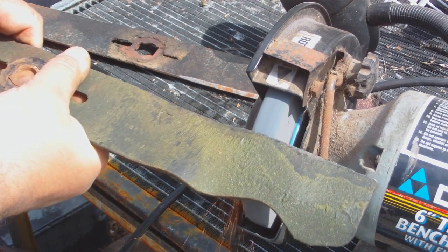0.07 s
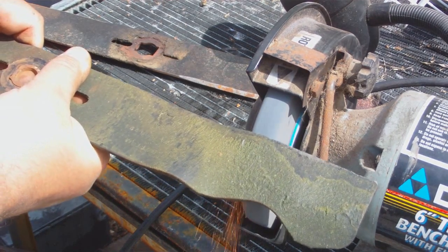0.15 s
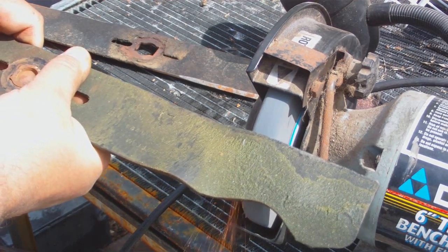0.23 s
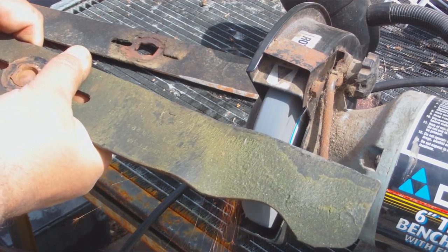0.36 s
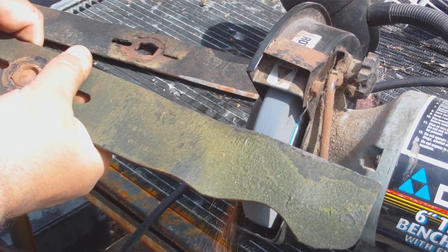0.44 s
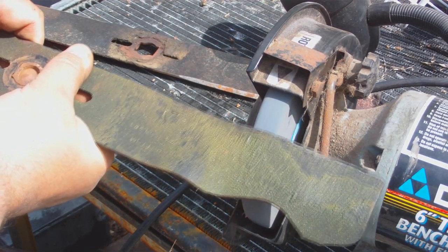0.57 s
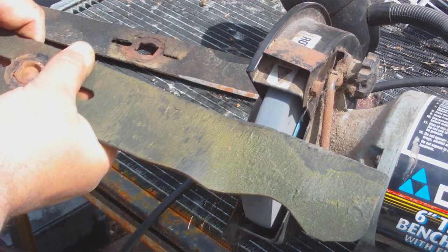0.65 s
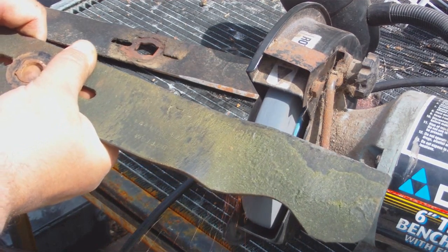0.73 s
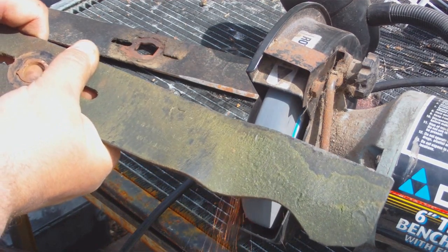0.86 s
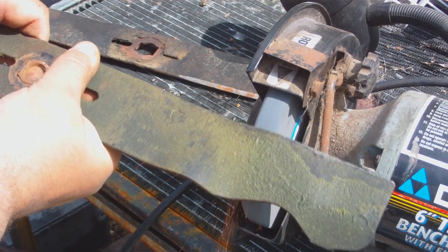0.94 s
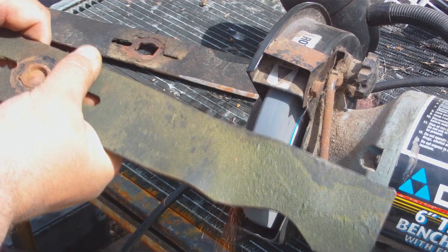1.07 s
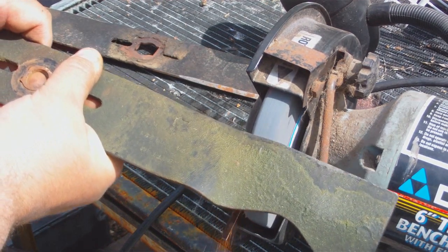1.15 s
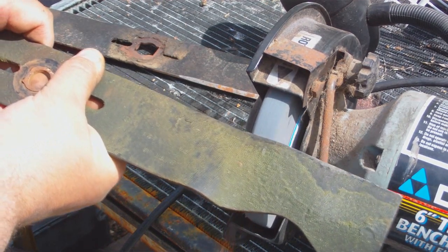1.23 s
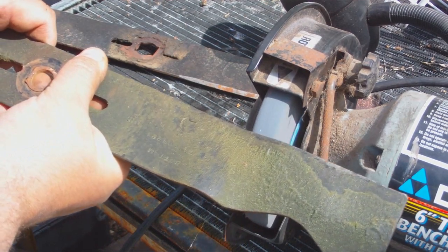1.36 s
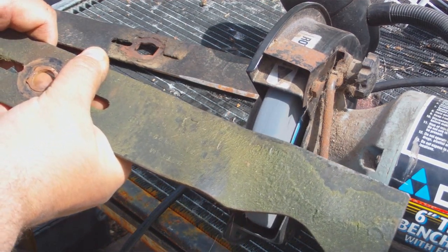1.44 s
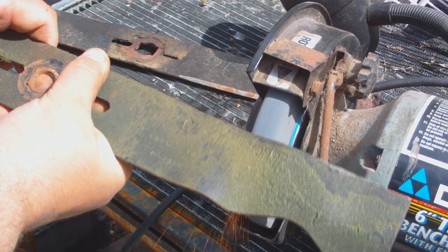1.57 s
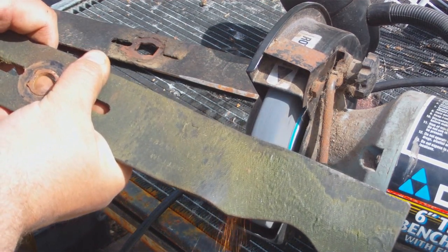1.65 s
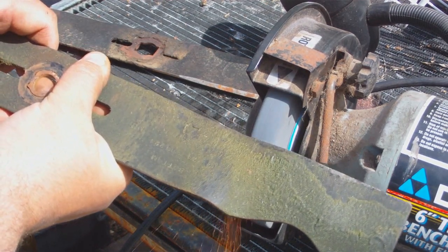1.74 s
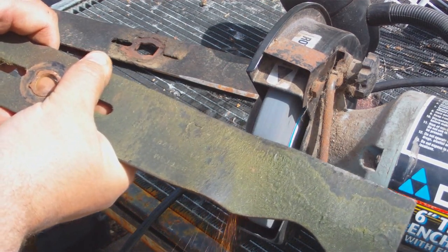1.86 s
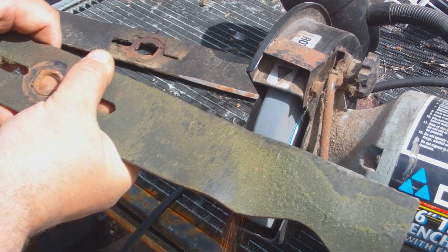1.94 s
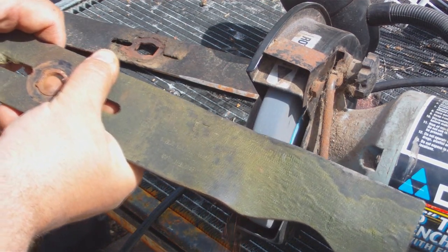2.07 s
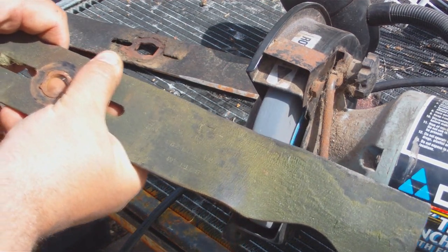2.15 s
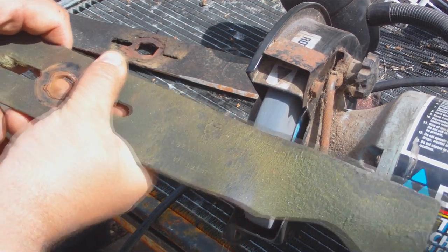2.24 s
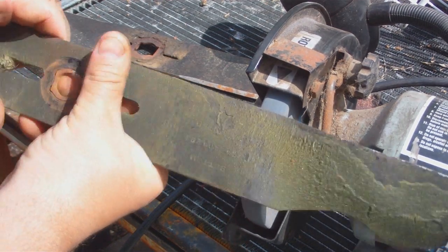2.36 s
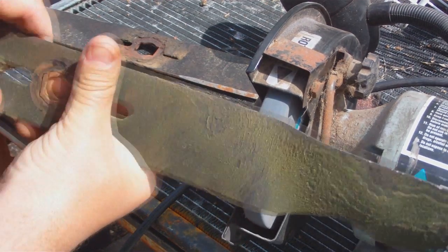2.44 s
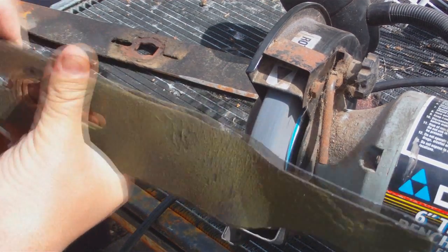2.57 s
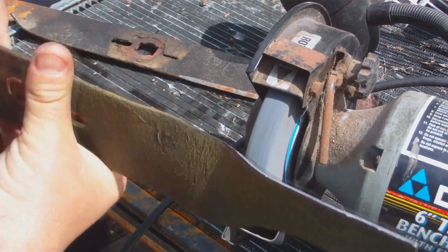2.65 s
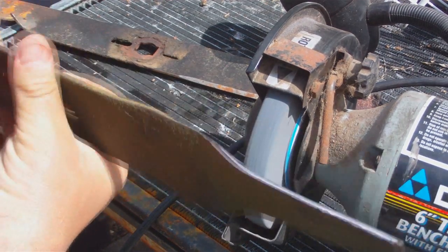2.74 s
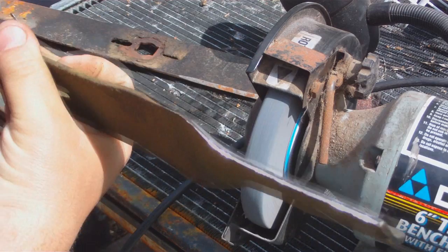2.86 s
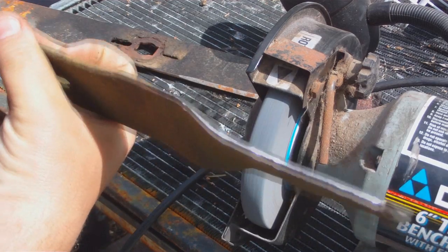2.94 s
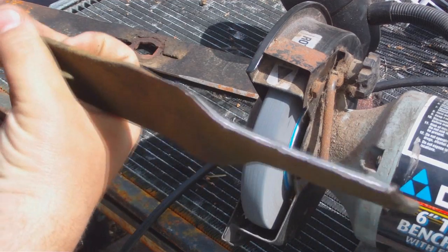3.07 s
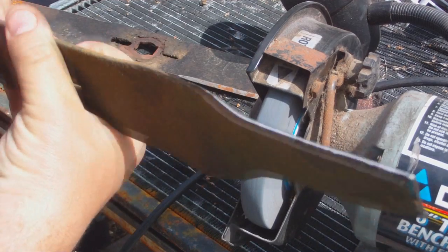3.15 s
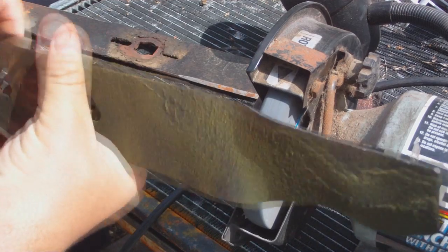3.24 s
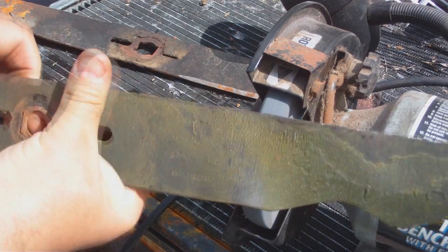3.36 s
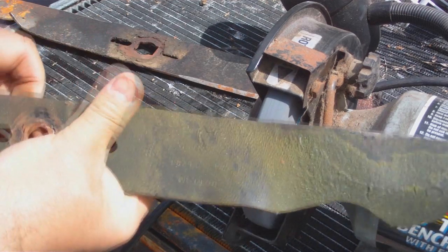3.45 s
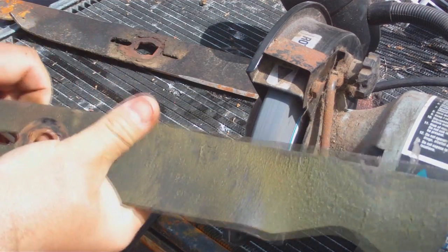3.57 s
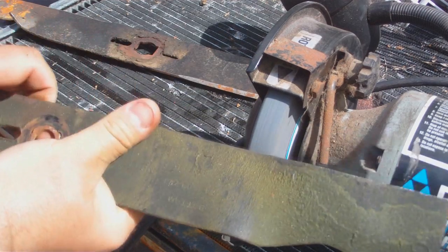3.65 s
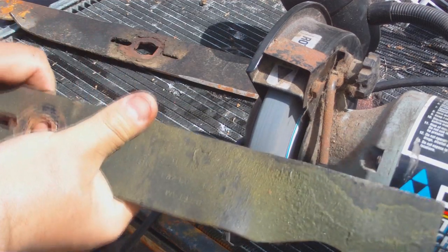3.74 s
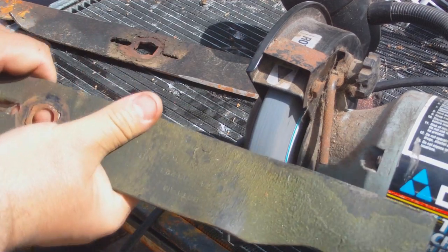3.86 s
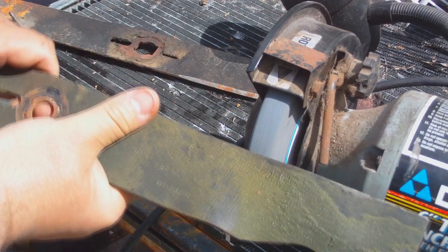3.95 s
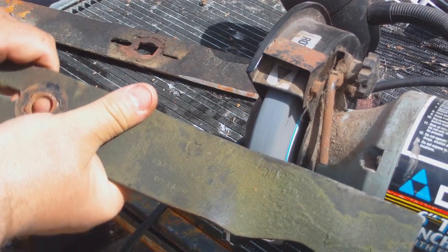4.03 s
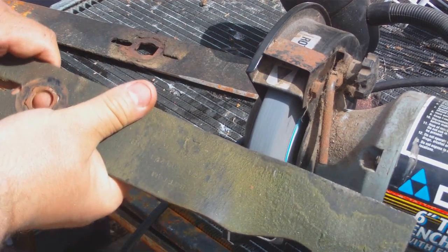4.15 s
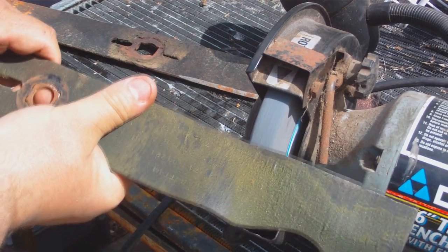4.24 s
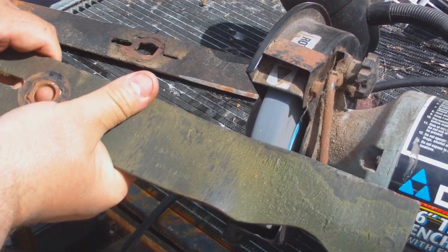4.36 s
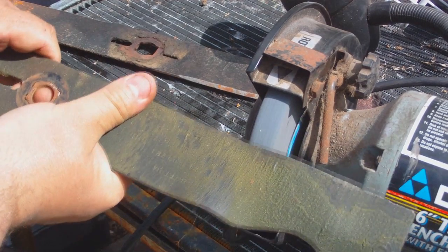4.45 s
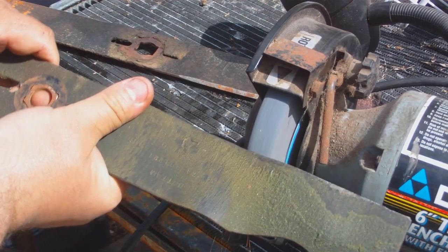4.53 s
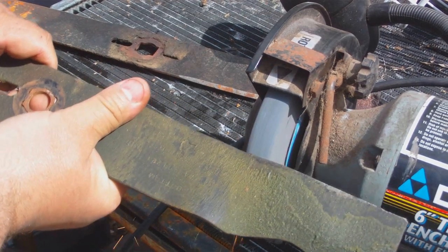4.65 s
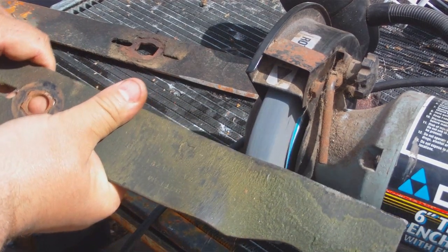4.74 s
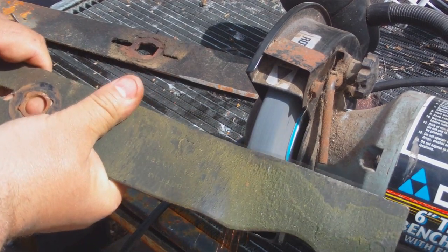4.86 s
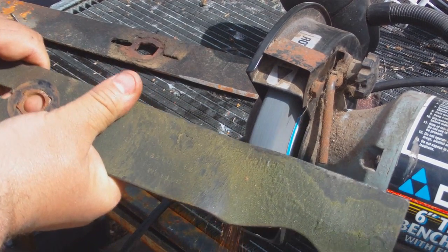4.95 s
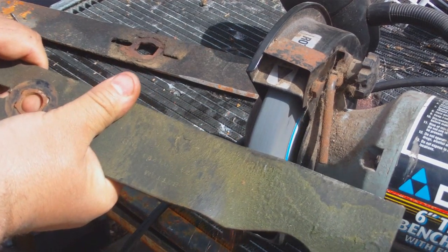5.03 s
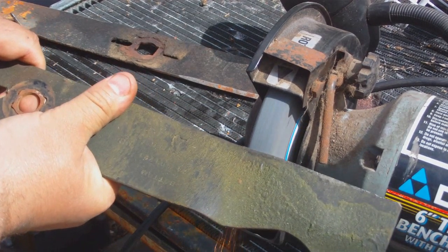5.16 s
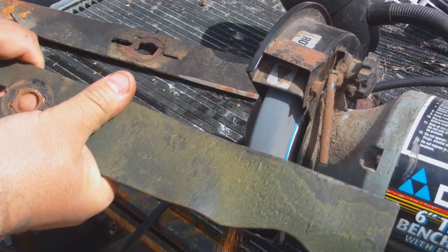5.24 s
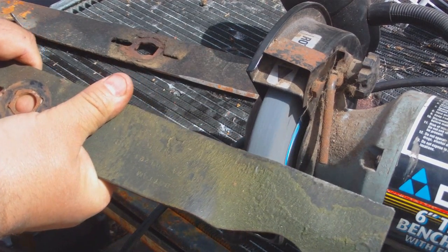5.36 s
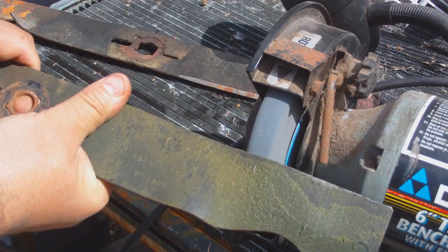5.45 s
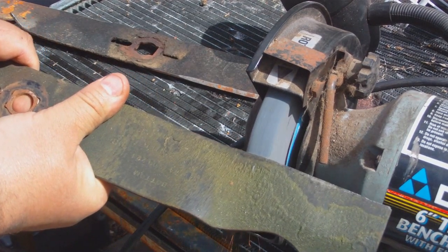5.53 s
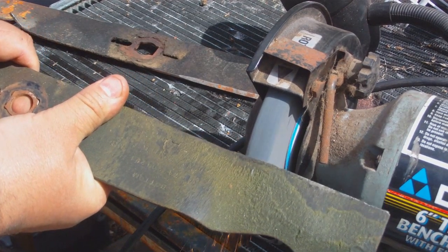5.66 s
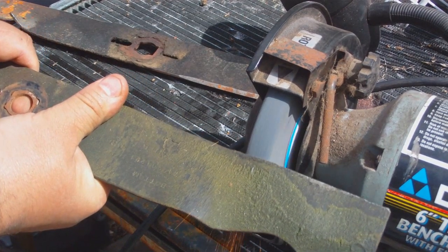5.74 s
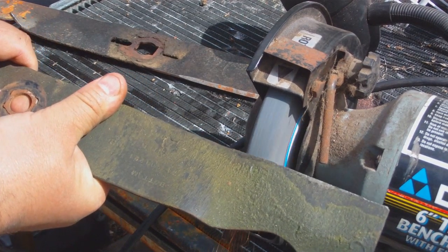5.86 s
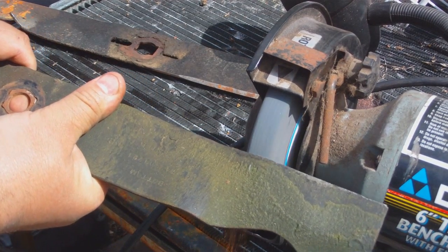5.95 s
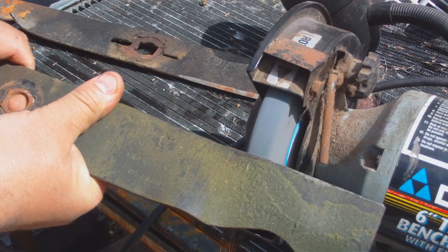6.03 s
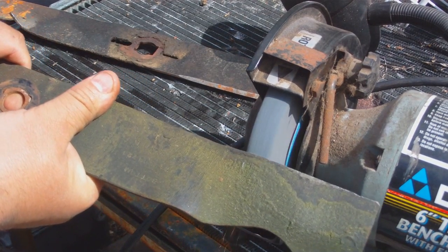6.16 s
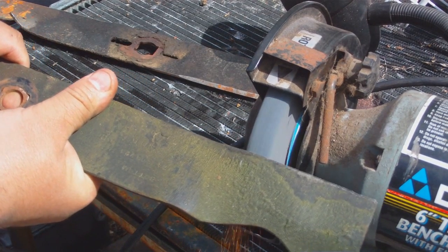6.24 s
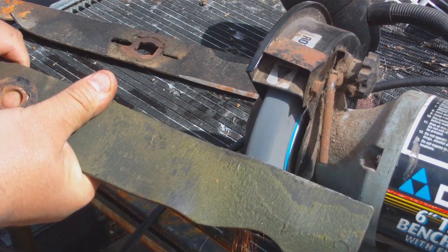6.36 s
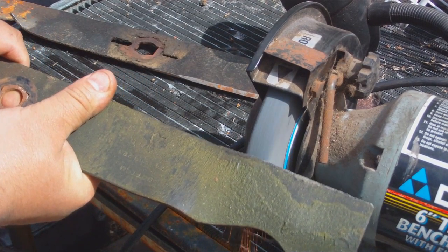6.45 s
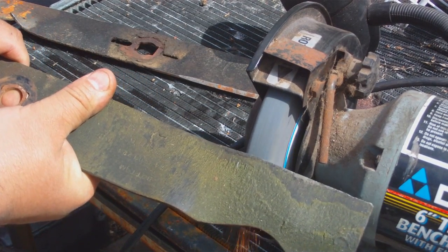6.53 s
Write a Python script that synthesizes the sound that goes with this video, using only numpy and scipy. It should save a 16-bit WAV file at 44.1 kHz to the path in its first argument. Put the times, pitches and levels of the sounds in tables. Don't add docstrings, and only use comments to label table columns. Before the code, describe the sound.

A steel blade grinds harshly on a spinning bench grinder, buzzing and ringing, lifts away to motor hum and light wind, then chatters back into grinding.

```python
import sys
import numpy as np
from scipy import signal
from scipy.fft import rfft, irfft
from scipy.io import wavfile
from scipy.ndimage import uniform_filter1d

SR = 44100
rng = np.random.default_rng(int(sys.argv[2]) if len(sys.argv) > 2 else 0)


def boost_factor(decibels):
    exponent = np.asarray(decibels, float) / 20
    return 10 ** exponent


def waveform_to_disk(signal):
    frames = np.transpose(np.atleast_2d(signal))
    scaled = np.clip(frames, -1, 1) * 32767
    samples = np.round(scaled).astype(np.int16)
    wavfile.write(sys.argv[1], SR, samples)


N = 291060
TIME = np.arange(N) / SR
TURNS_PER_S = 58.6

# (time [s], trail [turns])
TRAIL = [(0, -.14), (.35, -.08), (.65, 0), (1, .02), (2, .02), (2.35, 0), (2.55, -.08), (4.6, -2.0),
         (4.83, -2.14), (5, -2.26), (5.3, -2.35), (5.6, -2.36), (6, -2.27), (6.6, -2.13)]
# (start [s], end [s], level [dB])
PASSES = [
    (0, 2.345, -14.5),
    (4.6, 6.6, -13.5),
]
# (time [s], peak [dB])
BOUNCES = [
    (.2972, -4),
    (2.355, 5),
    (2.3755, -1),
    (2.3935, -5),
    (2.408, -14),
]
# (start [s], length [s])
GRIP_SHIFTS = [
    (0.626, 0.39),
    (1.15, 0.32),
    (2.055, 0.15),
    (3, .1),
    (4.808, 0.037),
    (5.057, 0.71),
    (5.598, 1),
]
# (frequency [Hz], width [Hz], level in each of four grips [dB] x 4)
BLADE_FIRST = [(935, 64, -0.5, -3, -6, -23), (1110, 34, -5, -5, -5.5, -26), (1298, 67, -2, 0, -3.5, -2.5),
               (1435, 76, -5, -9.5, -9.5, -26), (2043, 170, 2.5, -4, -4.5, -0.5),
               (2253, 90, -10, -6.5, -2.5, 0.5), (2525, 170, -3, -3.5, -14, -7),
               (2840, 54, -18, -1.5, -3, -2), (3195, 105, -6, -6, -28, -15), (3361, 79, -2, -2, -5, -5.5),
               (3910, 130, 0, -13, -15, -24), (4423, 13, 9, 10, 0, -11), (5076, 160, -16, -4, -3.5, -6),
               (5700, 36, -6, -4, -27, -25),
               (6325, 260, -6.5, -9.5, -16, -9.5), (6930, 34, -10, -3, -15, -7),
              (7130, 430, -3, -5, -9.5, -12), (7500, 520, -33, -23, -6.5, -3.5),
              (8170, 430, -13, -5.5, -5, -27), (8720, 320, -10.5, -23, -21, -13),
              (9950, 280, -10.5, -13, -9, -9.5), (10720, 440, -34, -26, -17.5, -12.5),
              (11280, 150, -13.5, -11, -22, -29), (12760, 180, -17, -60, -34, -32),
              (13500, 150, -34, -25, -18, -27), (14500, 260, -20, -29, -21, -25),
              (8300, 36, 0, -16, -9, -14), (4096, 320, -1.5, -7.5, -18, -30)]
# (frequency [Hz], width [Hz], level in each of four grips [dB] x 4)
BLADE_SECOND = [(893.6, 22.5, -30, -3.5, -6.5, -7), (1302, 40, -8, -7.5, -4.5, -5),
                (2100, 145, -3, -4, -2.5, -1), (2466, 31, -3, -2, -5.5, -15), (2705, 130, -8, -7, -7.5, -15),
                (2817, 50, -0.5, 1, -4.5, -25), (3100, 60, -25, -21, -24, -26),
                (3376, 107, -5.5, -4.5, -5, -2), (3880, 260, -20, -26, -6.5, -4.5),
                (4330, 93, -15, -27, -15, 1), (4490, 70, -18, -20, -2, -5), (5080, 134, 0.5, -7, -5, -6),
                (6000, 54, -26, -24, -23, -6), (6520, 50, -23, -5, -5, -12),
                (6950, 130, -13, -21, -0.5, -2), (7200, 140, -14, -10, -16, 2),
               (7840, 370, -3.5, -6.5, -6.5, -27), (8640, 30, -16, -9, -13, -3),
               (8332, 110, -12.5, -14, -23, -1.5), (8960, 50, -17, -13, -32, -10),
               (9490, 54, -23, -29, -30, -53), (9980, 220, -16, -13, -12.5, -28),
               (11280, 51, -20, -19, -34, -34), (10880, 390, -11, -18, -23, -36),
               (11940, 160, -31, -26, -20, -35), (13200, 90, -32, -32, -35, -34),
               (13400, 60, -31, -43, -38, -39), (7000, 1040, -11.5, -13.5, -8, -8.5)]
# (frequency [Hz], level [dB])
BETWEEN_MODES = [(300, -26.5), (700, -20.5), (1500, -13), (3000, -16), (4200, -20.5), (5500, -14),
                 (7500, -31), (9300, -25), (12000, -28), (15300, -39)]
VALLEY_HZ = 5500
VALLEY_DB = [1, 0, -2.5, -3, -1, 1, 2, -0.5]
# (frequency [Hz], width [Hz], level change in each grip [dB] x 4)
GAPS = [
    [(1570, 270, 0, -2.5, 0.5, 1), (4760, 270, -9, -3, -2, -1), (5270, 170, -4, -6, -5, -5),
     (6060, 340, -13, -3, -4, -4), (7700, 690, -7, -7, -0.5, -0.5), (8880, 170, -11, -4, 1, 2)],
    [(1824, 154, -8, -10, -18, -6), (2860, 210, -6.5, -11, -5, -3), (4740, 270, -3, -7, -8, 5),
     (5970, 230, -12, -13, -1, 0.5), (6900, 160, -5, -1, -9, 2), (7480, 160, -5, -8, -12, -1)],
]
# (frequency [Hz], likeness [0-1])
GRIT_REPEAT = [(500, 0.83), (1500, 0.84), (3000, .85), (6000, 0.93), (12000, 0.84)]
# (time [s], landing ahead of the high spot [turns],
# bounce every other turn [dB], ridge kicks over the landing blow [dB], rubbing relative to the blow [dB])
LANDING = [
    [(0, 0.45, .5, 9, -9), (.42, 0.45, .5, 5, -11), (.47, 0.5, .5, 0, -11), (.62, 0.45, .5, 8, -9),
     (.8, 0.45, .5, 6, -9), (1.35, 0.37, 1, 2.5, -12), (1.9, 0.36, .8, 0, -13), (2.15, 0.35, 1.5, 0, -11),
     (2.345, 0.23, 0.5, 8, -9)],
    [(4.6, 0.036, 6, 17, -7), (4.82, 0.041, 11.5, 15, -7), (4.87, 0.18, 5, -4, -7), (4.96, 0.14, 1, 6, -7),
     (5.02, 0.043, 3.5, 15, -7), (5.15, 0.36, 1, 1, -9), (5.5, 0.39, 0.5, 3, -9), (6.1, 0.4, .5, -3, -6),
     (6.6, 0.4, 1, 2, -7)],
]
# (time [s], peak [dB])
UNEVEN_LANDINGS = [(0.0645, 9), (0.074, 1), (0.0926, -4), (0.1115, 1), (0.1267, 4.3), (0.1437, -4),
                   (0.1688, 9), (0.1774, 8), (0.1976, 8), (0.2175, -2), (0.233, -0.2), (0.252, 0),
                   (0.2637, 0.2), (0.2804, 5), (0.2974, 7), (0.3163, -8), (0.333, 4), (0.35, 1.4),
                   (0.3665, -7), (0.3852, -3), (0.401, 7), (0.4234, 7), (0.435, 8.7), (0.452, 9.5),
                   (0.469, 9), (0.4911, -1.8), (0.502, 8), (0.526, 1), (0.5368, 4), (0.5534, 2),
                   (0.5705, -2), (0.589, 1.4), (0.6062, -1.6), (0.6237, -3), (0.6395, -3), (0.6614, -2.3),
                   (0.6737, 7), (0.6946, 6), (0.7088, 12), (0.731, 5), (0.7434, 7.5), (0.7622, 1.0),
                   (0.7764, 11), (0.7993, 8), (0.8114, 3), (0.8307, 4), (0.8428, 3.8), (0.8655, 5.6),
                   (0.8786, 6), (0.8998, 7), (0.9137, 3), (0.9331, 5.5), (0.9474, 6), (0.968, 7),
                   (0.9813, 6), (1.003, 6), (1.0173, 1), (1.037, 6.4), (1.051, 0), (1.0708, 6)]
# (place after the high spot [turns], level [dB])
RIDGES = [(-.23, -17.5), (-.11, -11), (-.01, 2), (0.098, -19.5), (0.2, -17), (0.309, -11.5)]
# (time [s], length [s], level [dB], dullness [0-1], share of landing lead lost [0-1])
LAPSES = [
    (0.298, 0.051, -2, 0.43, .01),
    (1.377, 0.015, -1, 0.04, 0.012),
    (2.039, 0.011, -8, 0.2, .01),
    (4.84, 0.012, -12, 0, .01),
    (5.33, 0.15, -1.5, 0.4, 0.013),
    (6.383, 0.069, 0, 0.4, 0.45),
]
# (time [s], level [dB])
SETTLING = [
    (4.6, -14),
    (4.8, -5.5),
    (5.03, -3.5),
    (5.1, -1.5),
    (5.2, -1.5),
]
# (time [s], share [0-1])
STEADY_LOW = [(0, 0.6), (.6, 0.14), (1.3, 0.27), (1.9, 0.9), (2.35, 0.51), (4.6, 0.04), (5.1, 0.2),
              (5.6, 0), (6.6, 0.26)]
# (frequency [Hz], level [dB])
LOADED_FIRST = [(59.2, -51.0), (177.6, -38), (236.9, -40), (409.1, -43.5), (468.3, -36.0), (527.6, -36.5),
                (586.8, -36), (646.0, -38.0), (705.2, -48), (877.5, -41.0), (936.7, -35.5), (1055, -37.0),
                (1114, -39.5), (1287, -32), (1346, -40.0), (1464, -32.0)]
# (frequency [Hz], level [dB])
LOADED_SECOND = [(59.2, -54.5), (177.6, -41.0), (209.9, -41), (236.9, -43.5), (468.3, -40.0), (877.5, -38),
                 (936.7, -38), (995.9, -37)]
# (frequency [Hz], level [dB])
MOTOR_LINES = [(236.9, -44.0), (296.1, -61.0), (355.3, -44.5), (419.9, -42), (446.8, -41.0), (479.1, -94),
               (597.5, -39.0), (893.6, -46.5), (1098, -45), (1432, -77.0), (1965, -45.0), (2799, -52.5),
               (2977, -47.5), (3036, -51), (3456, -43.5), (3811, -82), (3871, -51.5), (4107, -57),
               (4587, -54.5), (5776, -56), (7682, -69), (7741, -58), (8457, -55), (10422, -59),
               (11316, -78), (11375, -70), (11434, -51), (12387, -74)]
# (frequency [Hz], width [Hz], level [dB])
HOUSING = [(1425, 30, 15.5), (2031, 10, 7.5), (2800, 20, 5), (3030, 15, 10), (3550, 51, -11),
           (3694, 110, -10), (4590, 16, -32), (5600, 250, -22), (6370, 70, -20), (7850, 64, -30),
           (8180, 22, 1), (10400, 47, -9), (11500, 63, -20), (12400, 38, -18)]
# (frequency [Hz], level per Hz [dB])
FAN = [(59, -60), (100, -6.5), (307, -5.5), (593, 5), (1220, -8.5), (1380, -7.5), (1980, -7.5), (2560, -16),
       (3440, -18), (5040, -25), (9120, -25), (11800, -25), (15800, -38)]
FAN_DB = -25
# (frequency [Hz], width [Hz], level per Hz on the scale of FAN [dB])
GUARD = [(1340, 120, -7), (3520, 160, -12.5), (3820, 150, -32), (5570, 200, -21), (6360, 100, -20),
         (7570, 150, -19.5), (8500, 150, -35), (10350, 200, -18), (11500, 130, -14.5), (12400, 150, -28)]
CALM_DB = -53.5
# (time [s], length [s], peak [dB])
GUSTS = [(0.06, 0.18, -35.5), (0.282, 0.17, -37.5), (0.598, 0.21, -42), (1.47, 0.098, -35),
         (1.97, 0.055, -42), (2.085, 0.063, -34), (2.21, 0.1, -37), (2.388, 0.14, -34.5),
         (2.562, 0.19, -43), (2.747, 0.062, -36), (2.98, 0.14, -44), (3.34, 0.078, -28.5),
         (3.62, 0.42, -49), (3.886, 0.17, -42), (4.098, 0.18, -35), (4.32, 0.26, -36.5), (4.62, 0.52, -40)]
# (frequency [Hz], level [dB])
WIND_COLOUR = [(15, -47), (45, -3.5), (80, -8.5), (140, -9.5), (300, -13), (700, -76)]
# (time [s], peak [dB], frequency [Hz])
BUFFETS = [
    (2.545, -28, 62),
    (2.585, -45, 70),
    (3.288, -21.5, 81),
    (3.316, -23, 101),
    (3.336, -22, 155),
    (4.055, -22, 60),
    (4.11, -22, 111),
]
# (start [s], end [s], frequency [Hz], level [dB], ring [ms])
SQUEALS = [(0.052, .72, 4500, -36, 8), (.6, 1.49, 4446, -24.5, 11), (0, 0.97, 5700, -42, 4),
           (0, 0.79, 5240, -38, 4), (.05, 1.95, 3338, -31, 10), (1.25, 2.4, 8290, -28.5, 10),
           (1.303, 2.16, 5090, -29, 1.5), (1.903, 2.4, 5023, -25.5, 2), (2.0, 2.7, 4450, -35, 5.7),
           (4.5, 4.88, 5030, -24, 5.6), (4.62, 4.7, 8420, -32, 8.7), (4.84, 5.5, 6520, -31, 9.2),
           (5.001, 5.36, 3377, -25, 14), (5.504, 6.6, 3408, -23.5, 6.3), (5.1, 5.5, 2845, -23, 5),
           (5.503, 7.8, 4436, -30, 6.8), (5.702, 5.2, 5100, -28, 4.5), (6.2, 6.7, 8430, -29, 4.9)]
# (time [s], peak [dB], contact [ms])
CHATTER = [(4.5031, 6.5, 2), (4.5383, 6, 1.5), (4.5675, -1, 1.6), (4.57, 4.5, 1.6), (4.5924, 5.5, 1.1),
           (4.605, 8, 1.05), (4.6236, 8, 1.1), (4.6413, 4, 1), (4.658, 0, 2.2), (4.6758, 1, 1.5),
           (4.6925, 5, 1.3), (4.7092, 5, 1.2), (4.7267, 2.5, 1.04), (4.7426, 1, 1.9), (4.76, 2.5, 1.2),
           (4.778, 1, 1.6), (4.7935, 3, 0.99), (4.812, 2, 0.98), (4.8263, 5.5, 1.1), (4.8417, 5, 1),
           (4.858, -2, 1.2), (4.8725, 1, 1.5), (4.891, 1, 1.8), (4.907, -14, 0.9), (4.924, 2, 1.3),
           (4.9422, -2.5, 1.4), (4.9584, -3.5, 1.9), (4.977, 1.5, 1.2), (4.9945, 1, 1.3), (5.013, -5, 0.91),
           (5.029, -4, 1.38), (5.0447, -9, 1.1), (5.0612, -2.5, 1), (5.079, -9, 1)]


def evened(x):
    return x / np.sqrt(np.mean(x ** 2) + 1e-20)


def read(points, hz):
    f, value = np.transpose(points)
    return np.interp(np.log(hz + 1), np.log(f + 1), value)


def follow(rows, t=TIME):
    s, *columns = np.transpose(rows)
    return [np.interp(t, s, column) for column in columns]


def bump(s, length, t=TIME):
    return np.exp(-(2 * (t - s) / length) ** 2)


def colour(x, modes, between, gaps=()):
    hz = np.fft.rfftfreq(8192, 1 / SR)
    power = boost_factor(read(between, hz)) ** 2
    for f, width, db in modes:
        power = power + boost_factor(db) ** 2 / (1 + (2 * (hz - f) / width) ** 2) ** 1.6
    for f, width, db in gaps:
        power = power * boost_factor(2 * db * np.exp(-(2 * (hz - f) / width) ** 2))
    cepstrum = irfft(np.log(power) / 2)
    cepstrum[1:4096] *= 2
    cepstrum[4097:] = 0
    ring = irfft(np.exp(rfft(cepstrum)))
    return signal.oaconvolve(x, ring / np.linalg.norm(ring))[:N]


def wheel_angle():
    trail = uniform_filter1d(follow(TRAIL)[0], size=4000, mode="nearest")
    return TURNS_PER_S * TIME - trail


def surface(angle, repeat, fresh):
    turns, orders = int(angle[-1]) + 3, np.arange(340)
    likeness = np.clip(read(repeat, orders * TURNS_PER_S), .05, .999)
    slip = np.sqrt(-2 * np.log(likeness))
    creep = evened(uniform_filter1d(rng.standard_normal((turns, len(orders))), size=8, axis=1))
    phase = 2 * np.pi * rng.random(len(orders)) + np.cumsum(slip * creep, axis=0)
    track = irfft(np.exp(1j * phase) * (orders > 0), n=4096, axis=1).ravel()
    worn = np.interp((angle + 1) * 4096, np.arange(len(track)), track)
    return evened(evened(worn) + fresh * rng.standard_normal(N))


def blows(s, size, decay_s):
    train = np.bincount(np.clip(np.round(s * SR).astype(int), 0, N - 1), size, N)
    dying = signal.lfilter([1], [1, -np.exp(-1 / (decay_s * SR))], train)
    rise = np.exp(-1 / (0.00054 * SR))
    return signal.lfilter([1 - rise], [1, -rise], dying)


def lapse(column, t=TIME):
    return sum(row[column] * bump(*row[:2], t) for row in LAPSES)


def contact_force(angle):
    turn = np.arange(int(angle[-1]) + 2)
    spot_s = np.interp(turn, angle, TIME)
    lead, bounce_db, ridge_db, rub_db = follow(LANDING[0] + LANDING[1], spot_s)
    luck = rng.standard_normal((len(turn), 3 + len(RIDGES)))

    bounce = (-1.) ** turn + 0.31 * luck[:, 0]
    lead = lead * (1 - lapse(t=spot_s, column=4))
    lead = lead * (1 + .035 * bounce_db * bounce + .05 * luck[:, 1])
    land_s = spot_s - lead / TURNS_PER_S
    land_db = bounce_db * bounce + 0.3 * luck[:, 2]
    touch_s = land_s.copy()

    uneven_s, uneven_db = np.transpose(UNEVEN_LANDINGS)
    which = np.searchsorted(spot_s, uneven_s)
    land_s[which] = uneven_s - .0004
    land_db[which] = 1.25 * uneven_db - 1
    touch_s = np.where(spot_s < .6, np.minimum(touch_s, land_s), land_s)
    lead = (spot_s - touch_s) * TURNS_PER_S

    force = blows(land_s, boost_factor(land_db), 0.0011)
    rub = boost_factor(rub_db + 0.69 * luck[:, 1])
    force += np.abs(blows(touch_s, rub, 1e3) - blows(spot_s + .002, rub, 1e3))
    force += blows(spot_s + 0.0012, 0.22 * rub, 0.0064)
    for (place, db), chance in zip(RIDGES, luck[:, 3:].T):
        drift = evened(uniform_filter1d(chance, size=20))
        kick_db = db + ridge_db + 1.5 * drift + .5 * chance - .2 * bounce_db * bounce
        size = boost_factor(kick_db) * (place > -lead)
        force += blows(spot_s + place / TURNS_PER_S, size, 0.00064)
    return force


def pressure():
    held = sum(boost_factor(db) * (TIME >= a) * (TIME <= b) for a, b, db in PASSES)
    return boost_factor(lapse(column=2)) * uniform_filter1d(held, size=150, mode="nearest")


def blade(angle):
    grit = surface(angle, GRIT_REPEAT, np.interp(TIME, [2.4, 4.5], [.4, .55]))
    force = contact_force(angle)
    force = force / np.sqrt(uniform_filter1d(force ** 2, size=3000)) * pressure()
    force = force * np.where(TIME > 3, boost_factor(follow(SETTLING)[0]), 1)
    steady = np.sqrt(abs(uniform_filter1d(force ** 2, size=800)))
    s, peak_db = np.transpose(BOUNCES)
    force = force + blows(s, boost_factor(peak_db), .001)
    strikes = chatter()

    knocks = np.diff(force + 0.64 * strikes, n=2, prepend=[0, 0])
    poles = signal.butter(8, 5000, fs=SR)[1]
    knocks = signal.lfilter(poles[::-1], poles, knocks * (TIME > 0))
    force = force + 0.85 * strikes
    drive = grit * force + 70 * knocks

    calm = np.clip(follow(STEADY_LOW)[0], 0, 1) * (grit * steady - drive)
    drive = drive + signal.filtfilt(*signal.butter(N=3, Wn=4200, fs=SR), calm)
    dull = np.clip(0.034 + lapse(column=3), 0, 1)
    muffled = signal.lfilter(*signal.butter(2, 6500, fs=SR), drive)
    drive = (1 - dull) * drive + dull * 2.0 * muffled

    grip = sum(np.clip((TIME - start) / length, 0, 1) for start, length in GRIP_SHIFTS)
    passes = (BLADE_FIRST, BLADE_SECOND)
    out = np.zeros(N)
    for k in range(8):
        column = 2 + k % 4
        modes = [(m[0], m[1], m[column]) for m in passes[k // 4]]
        gaps = [(g[0], g[1], g[column]) for g in GAPS[k // 4]]
        base = [(hz, db + VALLEY_DB[k] * (hz == VALLEY_HZ)) for hz, db in BETWEEN_MODES]
        share = np.sin(np.pi / 2 * np.clip(1 - abs(grip - k), 0, 1)) ** 1.93
        out += colour(drive * share, modes, base, gaps)
    return boost_factor(-0.88) * out + squeal(force)


def load():
    return uniform_filter1d((pressure() > 1e-6) * 1., size=2000, mode="nearest")


def orders_hum(angle, lines, turns_per_s, waver):
    out = np.zeros(len(angle))
    for hz, db in lines:
        steps = rng.standard_normal((N // 1000 + 2, 2)) @ [1, 1j]
        steps = uniform_filter1d(steps.real, size=3) + 1j * uniform_filter1d(steps.imag, size=3)
        swing = 1 + waver * np.interp(np.arange(len(angle)) / 1000, np.arange(len(steps)), steps)
        order = round(2 * hz / turns_per_s) / 2
        tone = np.exp(2j * np.pi * (order * angle + rng.random()))
        out += boost_factor(db + 1.5) * (swing * tone).real
    return out


def stand(angle):
    half = 3 * SR
    first = orders_hum(angle[:half], LOADED_FIRST, 58.57, .45)
    second = orders_hum(angle[half:], LOADED_SECOND, 58.5, .4)
    second = second * np.clip((TIME[half:] - 4.7) / .5, 0, 1)
    return load() * np.concatenate([first, second])


def motor(angle):
    throb = 1 + 0.078 * np.cos(2 * np.pi * angle)
    fan = boost_factor(FAN_DB - 3.5) * colour(rng.standard_normal(N) * throb, GUARD, FAN)
    base = [(300, -6), (1500, -18.0), (4000, -7.5), (8000, -32.0), (12500, -21), (14000, -50)]  # Hz, dB
    bearing = surface(angle, [(500, 0.936), (12000, 0.912)], 0.32)
    whirr = boost_factor(-45.5) * colour(bearing * throb, HOUSING, base)
    return fan + whirr + orders_hum(angle, MOTOR_LINES, 59.55, .2)


def wind():
    lumps = boost_factor(2.6 * evened(uniform_filter1d(rng.standard_normal(N), size=1200)))
    gusts = boost_factor(CALM_DB) + sum(boost_factor(db) * bump(s, length) for s, length, db in GUSTS)
    out = gusts * evened(lumps * colour(rng.standard_normal(N), [], WIND_COLOUR))
    for s, db, hz in BUFFETS:
        cycles = np.clip((TIME - s) * hz, 0, 2)
        out -= boost_factor(db) * np.sin(2 * np.pi * cycles) * np.sin(np.pi * cycles / 2) ** 1.5
    return out


def bench(x):
    t = np.arange(3000) / SR
    taps = rng.standard_normal(len(t)) * boost_factor(-60 * t / 0.05) * (t > .002)
    return x + boost_factor(-10.5) * signal.oaconvolve(x, taps / np.linalg.norm(taps))[:N]


def squeal(force):
    out = np.zeros(N)
    for start, end, hz, db, ring_ms in SQUEALS:
        keep = np.exp(-1000 / (max(ring_ms, .5) * SR))
        part = slice(max(round((start - .04) * SR), 0), min(round((end + .04) * SR), N))
        t = TIME[part]
        wander = 7 * evened(uniform_filter1d(rng.standard_normal(N // 100 + 2), size=8))
        pitch = hz + np.interp(t * SR / 100, np.arange(len(wander)), wander)
        tone = np.sin(2 * np.pi * np.cumsum(pitch) / SR)
        fade_in, fade_out = (t - start + .04) / .08, (end + .04 - t) / (.3 * (end - start))
        edges = np.clip(np.minimum(fade_in, fade_out), 0, 1)
        swell = evened(signal.lfilter([1], [1, -keep], force[part]))
        out[part] += boost_factor(db) * edges * np.sqrt(2) * swell * tone
    return out


def chatter():
    out, ms = np.zeros(N), np.arange(600) * 1000 / SR
    for s, db, contact_ms in CHATTER:
        at = round(s * SR)
        strike = (1 - np.exp(-ms / 0.52)) * np.exp(-ms / max(contact_ms, .3))
        out[at:at + len(ms)] += boost_factor(db - 1.5) * strike
    return out


def scene():
    angle = wheel_angle()
    ducked = boost_factor(-4 * load())
    return (bench(blade(angle)) + stand(angle) + ducked * motor(angle) + wind())[None]


def roll_off(x):
    return signal.sosfilt(signal.butter(12, 15980, fs=SR, output="sos"), x)


def record(dry):
    clipped = np.clip(dry, -.99, .99)
    low_pass = signal.firwin(301, 15500, window=("kaiser", 5), fs=SR)
    mix = signal.oaconvolve(clipped, low_pass[None], "same")
    return roll_off(mix)


dry = scene()
out = record(dry)
waveform_to_disk(out)
```